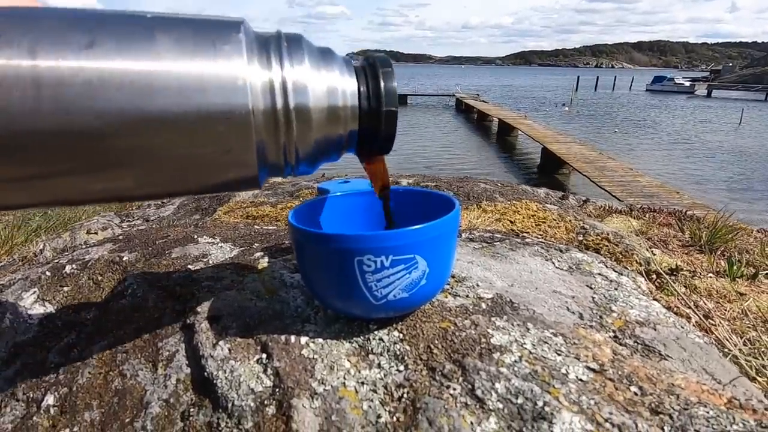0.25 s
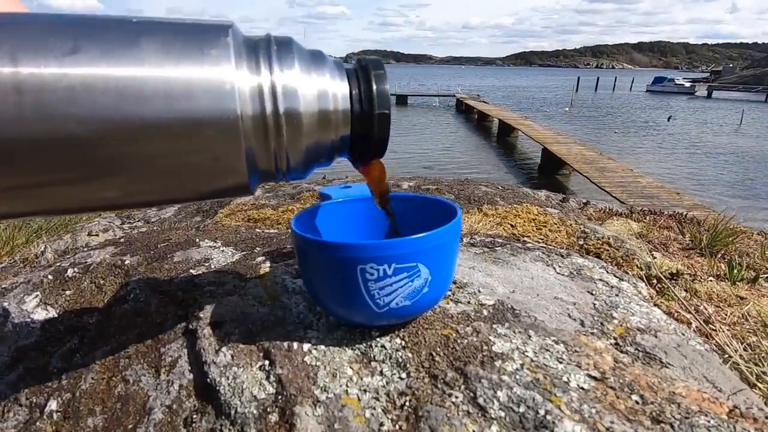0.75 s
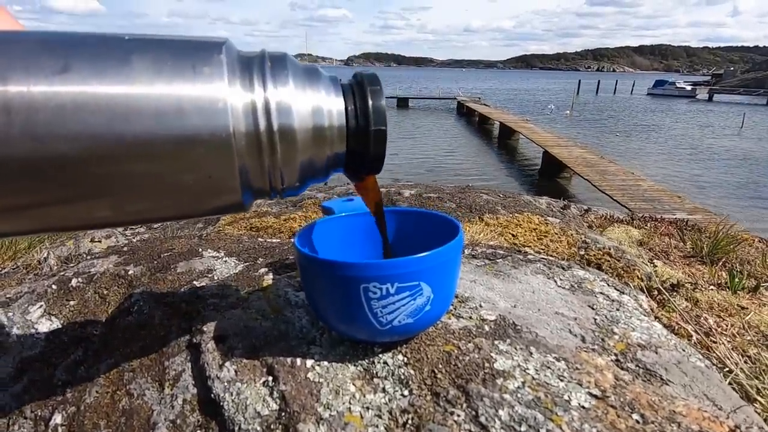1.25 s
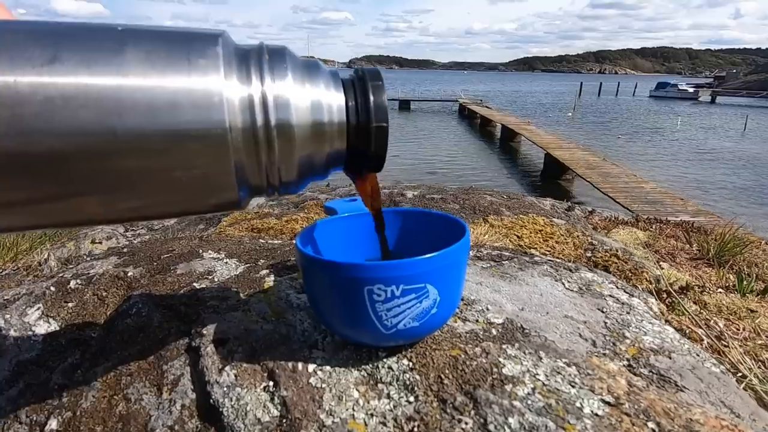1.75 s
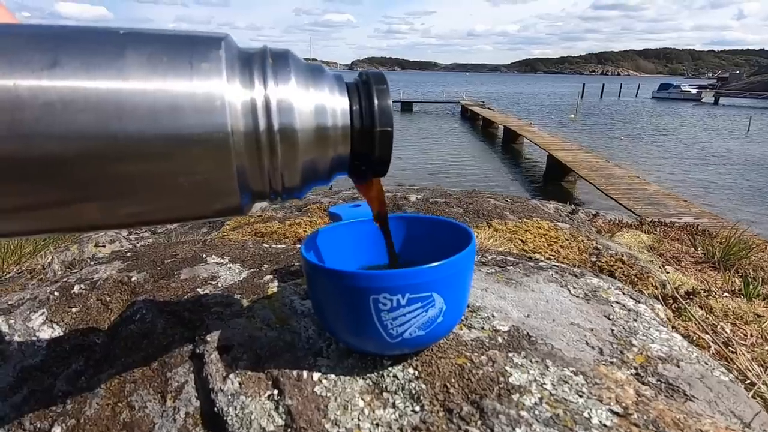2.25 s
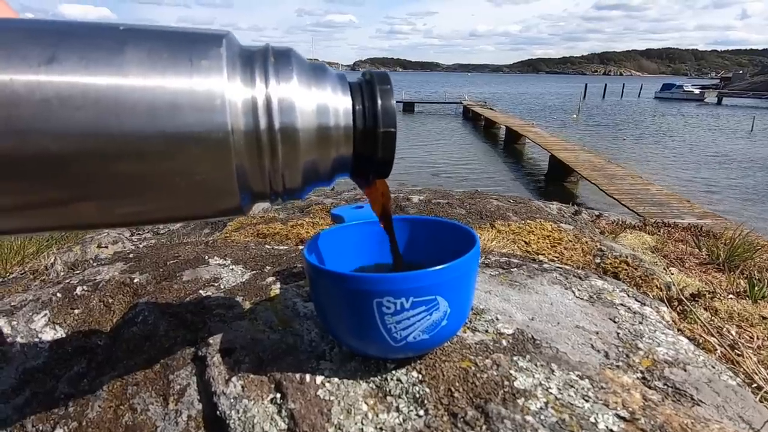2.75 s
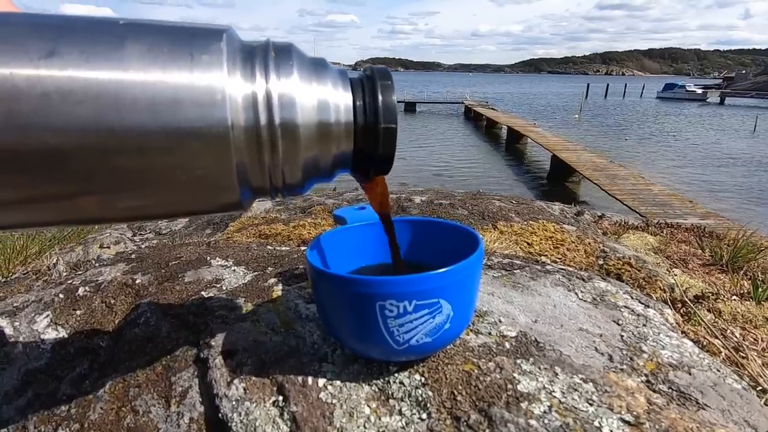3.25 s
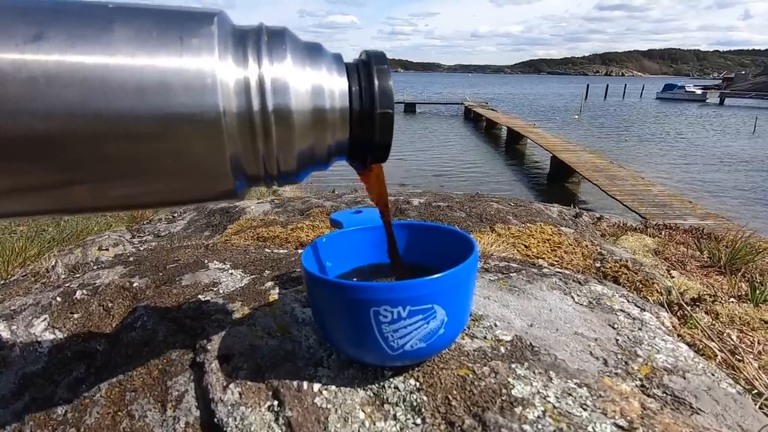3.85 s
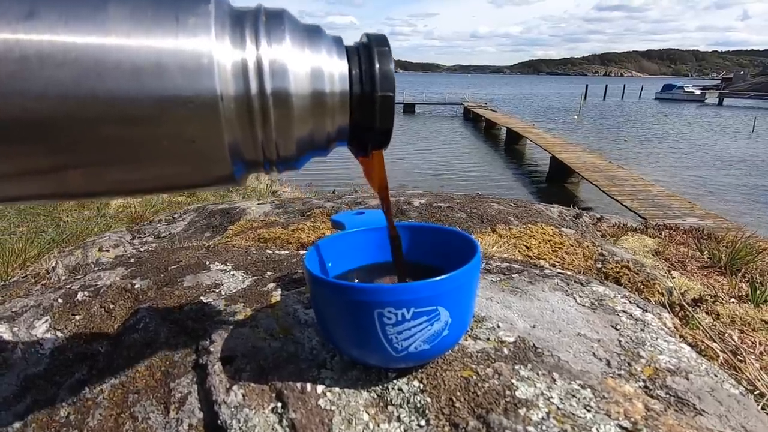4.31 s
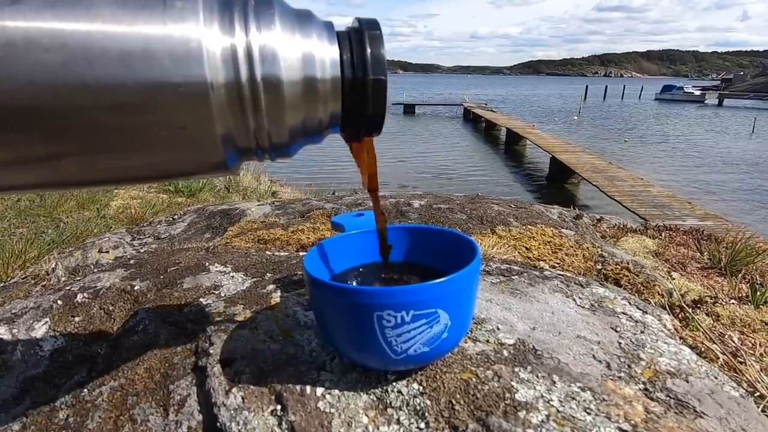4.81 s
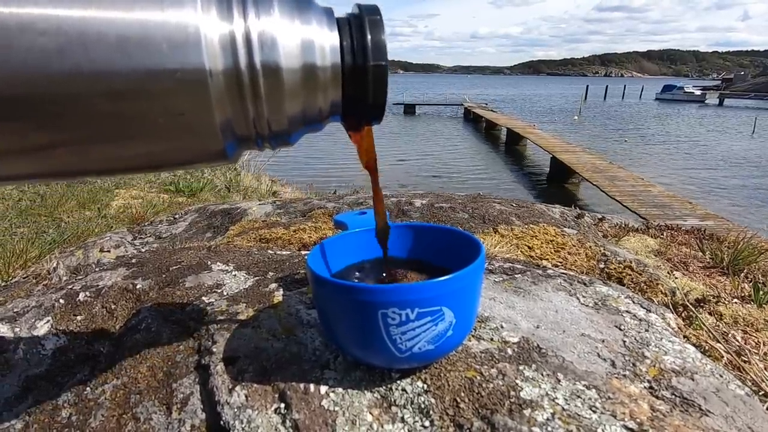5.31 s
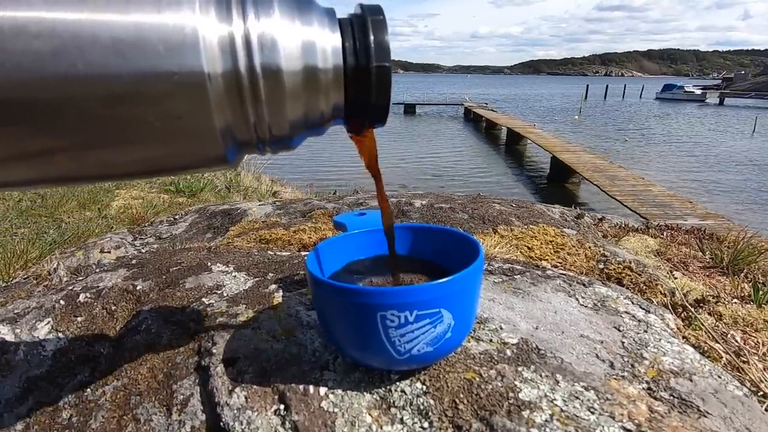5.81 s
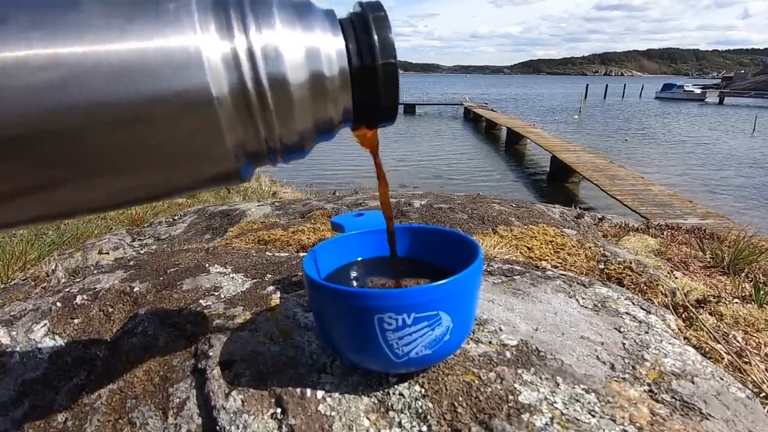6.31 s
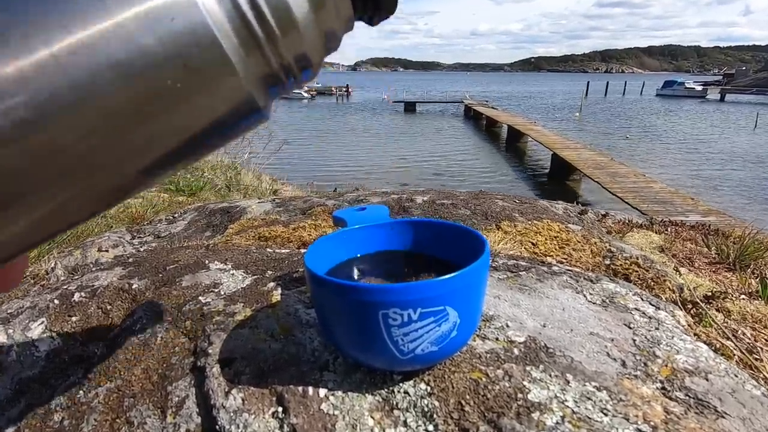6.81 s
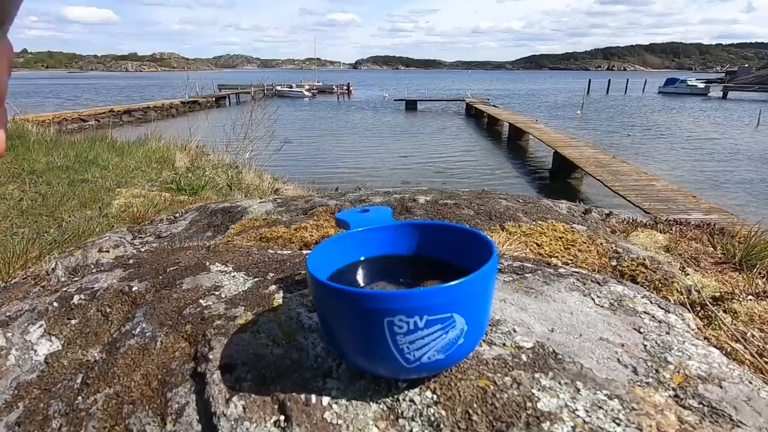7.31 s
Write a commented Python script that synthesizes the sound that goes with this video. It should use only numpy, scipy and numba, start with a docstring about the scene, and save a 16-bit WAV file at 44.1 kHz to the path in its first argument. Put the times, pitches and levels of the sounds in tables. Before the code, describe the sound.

A close pour from a steel flask into a plastic cup: bright spatter first, then dense watery bubbling with hollow, sinking cup resonance, ending in a few lower plops. Deep wind buffets hit the microphone irregularly throughout. Behind lie a faint shore wash, a far motor humming over the water and brief high chirps. After the pour, light knocks and a short ringing scrape of steel on stone.

```python
"""Wind rumbles and buffets the microphone, an engine drones far off over the water, a stopper knocks.
Then a drink is poured from a steel flask into a plastic cup on a rock by the sea.
Bubbles are decaying sines with a rising pitch; splashes, patter and wind are shaped noise.
Moving resonances ring the cup, whose walls sound deeper as it fills.
Last, noise bursts through the flask's modes set it down scraping on the rock."""
import sys
import numpy as np
from scipy import signal
from scipy.fft import rfft, irfft
from scipy.io import wavfile
from scipy.ndimage import uniform_filter1d
from numba import njit

SR = 44100
rng = np.random.default_rng(int(sys.argv[2]) if len(sys.argv) > 2 else 0)


def materialize(psi):
    """Save the field psi as 16-bit PCM at rate SR to the path in sys.argv[1].

    A 1-D psi becomes a single channel; in a 2-D psi each row is a channel.
    """
    bounded = np.clip(np.atleast_2d(psi).T, -1, 1)
    quanta = np.round(bounded * 32767).astype(np.int16)
    wavfile.write(sys.argv[1], SR, quanta)


N = 333545
TIME = np.arange(N) / SR


def undb(db):
    """Decibels to gain."""
    return 10 ** (np.asarray(db) / 20)


def unit(x):
    """Scale to rms 1."""
    return x / np.sqrt(np.mean(x ** 2) + 1e-20)


def curves(table):
    """The columns of a table, joined by straight lines in time."""
    s, *columns = np.transpose(table)
    return [np.interp(TIME, s, column) for column in columns]


def add(out, s, sound):
    """Mix a sound in at time s."""
    i = int(np.clip(s * SR, 0, N - 1))
    out[i:i + len(sound)] += sound[:N - i]


def butter(x, order, hz, kind="low"):
    """Causal low- or high-pass."""
    return signal.sosfilt(signal.butter(order, hz, kind, fs=SR, output="sos"), x)


def colour(x, points, size=1024):
    """Causal minimum-phase filter of unit energy through f/Hz, level/dB points."""
    hz, db = np.transpose(points)
    bins_hz = np.fft.rfftfreq(size, 1 / SR)
    bins_db = np.interp(np.log(bins_hz + 1), np.log(hz), db)
    # folding the cepstrum onto positive time gives the minimum phase
    cepstrum = irfft(np.log(undb(bins_db)))[:size // 2]
    cepstrum[1:] *= 2
    response = irfft(np.exp(rfft(cepstrum, size)))
    return signal.oaconvolve(x, response / np.linalg.norm(response))[:len(x)]


def noise(points):
    """Coloured noise of rms 1."""
    return unit(colour(rng.standard_normal(N), points, size=8192))


def ring(x, modes):
    """Sum of resonances, each f/Hz, width/Hz, level/dB."""
    out = 0
    for hz, width, db in modes:
        out = out + undb(db) * signal.lfilter(*signal.iirpeak(hz, hz / width, SR), x)
    return out


def walk(rate):
    """Smooth random drift of rms 1, with a new target this many times a second."""
    k = int(SR / rate)
    steps = np.repeat(rng.standard_normal(N // k + 1), k)
    return unit(uniform_filter1d(steps, k)[:N])


def steady(x, seconds):
    """Even out the slow swells of a noise."""
    return x / np.sqrt(uniform_filter1d(x ** 2, int(seconds * SR)) + 0.0081)


# Colour of the air and water along the shore: f/Hz, level/dB
SHORE_COLOUR = [(30, 6), (150, -4.5), (300, -9.5), (520, -12), (750, -7), (1000, -17.5), (2400, -21),
                (3200, -29), (5000, -32), (6000, -46), (7100, -36), (9000, -39.5), (13000, -57.5)]


def shore():
    """The wash of air and water along the shore: coloured noise with a slowly wandering level."""
    level_db = np.interp(TIME, [0, 3, 5.8, 7], [-61.5, -60.5, -60.5, -58])
    return noise(SHORE_COLOUR) * undb(level_db + 1.0 * walk(1.855))


# Course of the far engine: t/s, firing rate f/Hz, level/dB
ENGINE_COURSE = [(0, 132, -76.5), (2.6, 139.8, -68.5), (3.3, 138.4, -67), (4.2, 132.7, -67.5),
                 (5.85, 137.6, -69.5), (6.7, 142.9, -62), (7.56, 142.3, -60)]
# Engine harmonics: multiple of the firing rate, mean level/dB
ENGINE_HARMONICS = [(3, 1), (4, 1), (5, 4.5), (6, -7.5)]
ENGINE_WAVER = 0.0094  # rms share of the firing rate


def engine():
    """Harmonics of a firing rate, each wavering in pitch and level, make a drone."""
    hz, level_db = curves(ENGINE_COURSE)
    drone = 0
    for order, order_db in ENGINE_HARMONICS:
        harmonic_hz = order * hz * (1 + ENGINE_WAVER * walk(70))
        phase = 2 * np.pi * np.cumsum(harmonic_hz) / SR
        drone = drone + undb(order_db + 3 * walk(13)) * np.sin(phase)
    return unit(drone) * undb(level_db)


# Whistles: t/s, length/s, level/dB, starting f/Hz, closing f/Hz
WHISTLE_CALLS = [(2.517, 0.15, -67.5, 2940, 3350), (2.774, 0.086, -70.5, 3950, 3050),
                 (2.86, 0.055, -69, 3850, 4000), (2.98, 0.056, -66, 3400, 3470),
                 (3.097, 0.14, -59.5, 3030, 2930)]


def whistle(arch=0.088):
    """Thin arching whistles, like a far bird: sines bowed upward by a share of their pitch."""
    out = np.zeros(N)
    for start, length, db, start_hz, end_hz in WHISTLE_CALLS:
        bow = np.sin(np.linspace(0, np.pi, int(length * SR)))
        hz = np.linspace(start_hz, end_hz, len(bow)) * (1 + arch * bow)
        phase = 2 * np.pi * np.cumsum(hz) / SR
        add(out, start, undb(db) * np.sqrt(np.abs(bow)) * np.sin(phase))
    return out


# Wind strength, as its rumble on the microphone: t/s, level/dB
GUST_LEVEL = [(0, -46.5), (.3, -41), (.45, -34), (.75, -33), (1.9, -38.5), (2.42, -53.5), (2.72, -41.5),
              (2.95, -36), (3.12, -45), (3.5, -33), (3.85, -47.5), (4.08, -37), (4.35, -37), (4.72, -30),
              (5.4, -37), (5.72, -65.5), (5.92, -51.5), (6.2, -35.5), (6.36, -42), (6.55, -29.5),
              (6.92, -38.5), (7.33, -32), (7.56, -37)]
# Colour of the big eddies: f/Hz, level/dB
RUMBLE_COLOUR = [(12, -2), (25, 4.5), (55, 8), (95, -1), (130, -14), (220, -27.5), (1000, -100)]
# Colour of the small eddies: f/Hz, level/dB
FLUTTER_COLOUR = [(60, -12.5), (120, 0), (190, 1.5), (270, -12.5), (400, -17), (600, -29), (1000, -51.5),
                  (3000, -100)]
# flutter level (dB) at a reference rumble (dB), dB per dB of rumble, and rms unsteadiness (dB)
FLUTTER_DB, FLUTTER_AT_DB, FLUTTER_SLOPE, PUFFINESS_DB = -45.5, -36.5, 0.89, 5.5


def wind():
    """Big eddies rumble on the microphone; small ones flutter in quick puffs that grow with the gusts."""
    gust_db, = curves(GUST_LEVEL)
    puff_db = FLUTTER_DB + FLUTTER_SLOPE * (gust_db - FLUTTER_AT_DB) + PUFFINESS_DB * walk(22)
    rumble = steady(noise(RUMBLE_COLOUR), 0.31) * undb(gust_db)
    flutter = steady(noise(FLUTTER_COLOUR), 0.068) * undb(puff_db)
    return rumble + flutter


EDDY_MIDDLE_S = .35  # from the start of an eddy to its peak


def eddy(out_db, length, low_hz, top_hz, lumps_db, order=5):
    """Band-limited air noise that builds to a peak at its middle and trails away."""
    t = np.arange(-EDDY_MIDDLE_S, EDDY_MIDDLE_S, 1 / SR)
    swell = 1 / np.cosh(np.minimum(np.pi * np.abs(t) / length, 20))
    air = rng.standard_normal(len(t)) * undb(lumps_db * walk(130)[:len(t)]) * swell
    air = butter(butter(air, order, top_hz), 2, low_hz, "high")
    # a longer eddy carries more energy
    return undb(out_db) * unit(air) * np.sqrt(length / (1.37 * EDDY_MIDDLE_S))


# Round thumps of wind: middle t/s, length/s, level/dB, top f/Hz
WIND_THUMPS = [(0.4, 0.035, -33, 123), (0.611, 0.06, -35, 168), (0.732, 0.063, -28, 195),
               (0.771, 0.051, -26, 259), (0.895, 0.025, -31, 179), (0.96, 0.048, -34, 214),
               (1.139, 0.13, -35.5, 210), (1.248, 0.036, -30.5, 254), (1.614, 0.041, -31.5, 177),
               (1.734, 0.069, -35, 171), (1.913, 0.054, -31.5, 251), (2.184, 0.089, -38.5, 194),
               (2.312, 0.061, -36, 230), (2.501, 0.046, -36, 182), (2.737, 0.039, -37.5, 243),
               (2.911, 0.077, -32, 199), (3.469, 0.041, -37, 162), (3.605, 0.033, -33.5, 220),
               (4.524, 0.096, -34, 176), (4.678, 0.019, -26, 130), (4.707, 0.031, -22, 248),
               (4.846, 0.055, -28.5, 142), (5.212, 0.011, -17.5, 217), (5.248, 0.04, -21.5, 290),
               (5.356, 0.11, -32.5, 124.4), (6.23, 0.1, -39, 139), (6.554, 0.043, -30, 183),
               (6.698, 0.023, -29.5, 214), (6.815, 0.031, -30.5, 197), (6.999, 0.034, -35.5, 197),
               (7.164, 0.038, -34.5, 88), (7.328, 0.024, -27, 117), (7.447, 0.016, -30, 150)]
# Airflow tearing at the edge of the port: middle t/s, length/s, level/dB, top f/Hz
WIND_TEARS = [(0.777, 0.053, -39.5, 430), (0.944, 0.07, -55.5, 500), (1.253, 0.079, -45, 460),
              (1.381, .11, -48.5, 465), (1.92, 0.032, -53, 382), (4.698, 0.014, -34.5, 540),
              (5.209, 0.025, -35.5, 425), (5.253, 0.039, -30, 555)]
TEAR_LOW_HZ, TEAR_LUMPS_DB = 277, 7.5  # torn air holds little bass and comes in lumps


def buffets():
    """Fast eddies hit the port with round thumps; torn airflow adds a rougher, higher flutter."""
    out = np.zeros(N)
    for s, length, db, top_hz in WIND_THUMPS:
        add(out, s - EDDY_MIDDLE_S, eddy(db, length, 85, top_hz, lumps_db=0.5))
    for s, length, db, top_hz in WIND_TEARS:
        add(out, s - EDDY_MIDDLE_S, eddy(db, length, TEAR_LOW_HZ, top_hz, TEAR_LUMPS_DB, order=4))
    return out


# The flask touches the rock: t/s, relative level/dB, decay/s
ROCK_SCRAPES = [(7.181, -64.5, 0.014), (7.204, -57, 0.012), (7.235, -54.5, 0.011), (7.271, -61, 0.037),
                (7.293, -59, 0.016), (7.333, -68, 0.062), (7.483, -64.5, 0.028), (7.537, -67, .012)]
# Modes of the steel flask: f/Hz, width/Hz, relative level/dB
FLASK_MODES = [(958, 30, 8), (1440, 28, 0), (1960, 47, 8), (2486, 42, -0.5), (3330, 64, -7),
               (4240, 45, -1.5), (4660, 32, -8.5), (5150, 45, -10.5), (6800, 80, -11)]
# Light knocks of the stopper: t/s, relative level/dB, f/Hz
STOPPER_KNOCKS = [(0.069, -42, 3250), (0.14, -44.5, 2290), (.51, -46, 4770), (7.048, -42, 2580),
                  (7.072, -44, 2200), (7.485, -34.5, 2780)]
KNOCK_WIDTH_HZ, KNOCK_DECAY_S = 200, 0.0051


def flask(contact_db=3):
    """Steel grates over rock, each contact favouring other modes; the stopper gives dull, rattling knocks."""
    grit, steel, knocks = np.zeros(N), np.zeros(N), np.zeros(N)
    t = np.arange(SR // 2) / SR
    for s, db, length in ROCK_SCRAPES:
        grains = unit(rng.standard_normal(len(t)) * undb(4 * walk(900)[:len(t)]))
        push = undb(db) * np.exp(-t / length) * grains
        modes = [(hz, width, mode_db + contact_db * rng.uniform(-1.1, 1))
                 for hz, width, mode_db in FLASK_MODES]
        add(grit, s, push)
        add(steel, s, ring(push, modes))
    for s, db, hz in STOPPER_KNOCKS:
        tap = undb(db) * rng.standard_normal(len(t)) * np.exp(-t / KNOCK_DECAY_S)
        add(knocks, s, ring(tap, [(hz, KNOCK_WIDTH_HZ, 3), (hz * 1.45, KNOCK_WIDTH_HZ, -6)]))
        add(grit, s, undb(-21) * tap)
    body = butter(undb(21) * steel + knocks, 2, 7500)
    return body + colour(grit, SPLASH_COLOUR)  # grit shares the colour of the splashes


@njit
def resonator(x, hz, width):
    """State-variable band-pass with a moving centre."""
    y, band, low = np.empty(len(x)), 0., 0.
    for i in range(len(x)):
        g, k = np.tan(np.pi * hz[i] / SR), width / hz[i]
        v = (band + g * (x[i] - low)) / (1 + g * (g + k))
        band, low, y[i] = 2 * v - band, low + 2 * g * v, k * v
    return y


# Two low wall modes, mostly sinking as liquid loads the wall: t/s, first f/Hz, second f/Hz
WALL_MODES = [(0, 1490, 2730), (1.8, 1390, 2490), (2.6, 1360, 2070), (3.6, 1040, 1730), (4.8, 873, 1460),
              (5.9, 980, 1340), (6.6, 950, 1590)]
# Fixed resonances of the cup: f/Hz, width/Hz, level/dB
CUP_MODES = [(3120, 220, -2), (4600, 250, -12), (7250, 350, -5)]
WALL_WIDTH_HZ = 115.


def cup(x, first_db, second_db):
    """A sound in the liquid, with fixed and moving resonances of the cup around it."""
    first_hz, second_hz = curves(WALL_MODES)
    depth = np.interp(TIME, [1, 5], [.15, 1])  # more liquid couples more strongly to the wall
    first = undb(first_db) * resonator(x, first_hz, WALL_WIDTH_HZ)
    second = undb(second_db) * depth * resonator(x, second_hz, WALL_WIDTH_HZ)
    return x + ring(x, CUP_MODES) + first + second


def bubble(hz, t60, rise, pinch_cycles=1.0):
    """A trapped bubble swells as it pinches off, rings and dies, its pitch rising as it nears the surface."""
    t = np.arange(int(t60 * SR)) / SR
    tone = np.sin(2 * np.pi * hz * t * (1 + rise * t / t60 / 2))
    swell = 1 - np.exp(-(t * hz / pinch_cycles) ** 2)
    return tone * undb(-60 * t / t60) * swell


def swarm(count, low_hz, high_hz, spread_db):
    """Short-lived bubbles of random time, pitch and strength, together at rms 1."""
    out = np.zeros(N)
    for when, pitch, size, cycles, glide in rng.random((count, 5)):
        hz = low_hz * (high_hz / low_hz) ** pitch
        gain = undb(spread_db * min(-np.log(1 - size), 3.0))
        t60 = (5 + 30 * cycles ** 2) / hz
        add(out, when * N / SR, gain * bubble(hz, t60, rise=0.15 * glide, pinch_cycles=0.43))
    return unit(out)


def spurts(count):
    """Noise in small equal bursts that start at once and die quickly, together at rms 1."""
    kicks = np.zeros(N)
    for when in rng.random(count):
        kicks[int(when * N)] += 1
    envelope = signal.lfilter([1], [1, -np.exp(-1 / (.0022 * SR))], kicks)  # 2.2 ms decay
    return unit(rng.standard_normal(N) * envelope)


# How hard the stream churns the drink; also guides gurgle and lesser bubbles: t/s, relative level/dB
STREAM_LEVEL = [(0, -81), (.74, -76.5), (.85, -66.5), (1.35, -58), (1.78, -51.5), (2.22, -65),
                (2.75, -65.5), (2.92, -55.5), (3.45, -63), (3.72, -56), (4.0, -58.5), (5.0, -51),
                (5.7, -59), (6.15, -57), (6.4, -61), (6.64, -62)]
# Colour of the patter: f/Hz, level/dB
PATTER_COLOUR = [(450, -5), (900, -33.5), (1600, -3.5), (2600, -1), (3150, 4.5), (4400, -6), (5700, -18.5),
                 (7300, -23.5), (8800, -34), (11000, -41.5), (14000, -46.5)]
POUR_START_S, POUR_END_S, CUT_OFF_S = 0.63, 6.69, .05
# spatter on the bare bottom: its gain at first, and how soon the rising drink damps it
SPRAY_GAIN, SPRAY_FADE_S = 49, .6


def patter():
    """Under the stream many small bubbles burst and the liquid churns in quick spurts."""
    level_db, = curves(STREAM_LEVEL)
    bursts = swarm(count=4500, low_hz=773, high_hz=8710, spread_db=2.5)
    grains = bursts + undb(4) * spurts(count=800)
    grains = colour(grains * undb(5.1 * walk(70)), PATTER_COLOUR)
    # on the nearly bare bottom the stream spatters more brightly; deep liquid dulls it
    spray = signal.sosfiltfilt(signal.butter(2, 4200, "high", fs=SR, output="sos"), grains)
    bright = SPRAY_GAIN * np.exp(-np.maximum(TIME - POUR_START_S, 0) / SPRAY_FADE_S)
    sound = steady(unit(cup(grains, first_db=7.5, second_db=6.5) + bright * spray), 0.21)
    flowing = np.clip((POUR_END_S - TIME) / CUT_OFF_S, 0, 1)
    return sound * undb(level_db - 3.0) * flowing


def gurgle():
    """Larger pockets of air dragged under the surface give the pour its low, overlapping body."""
    level_db, = curves(STREAM_LEVEL)
    fade = np.interp(TIME, [1.4, 1.8, POUR_END_S - CUT_OFF_S, POUR_END_S], [0, 1, 1, 0])
    pockets = swarm(count=520, low_hz=800, high_hz=2500, spread_db=1.2)
    return pockets * fade * undb(level_db - 9)


BRIGHT_HZ = 5000  # a splash's treble lies above this


def splash(bright_db, count=9, size=1800):
    """The surface snaps shut, throws tiny droplets of their own pitch and leaves a wet wash; unit energy."""
    t = np.arange(size) / SR
    snap = 0.79 * rng.standard_normal(size) * np.exp(-t / 0.0024) * (1 - np.exp(-t / 0.00031))
    wash = undb(-16) * np.exp(-t / 0.015) * rng.standard_normal(size)
    out = snap + wash
    for pitch, lag, strength in rng.random((count, 3)):
        hz = 1500 * 5.5 ** pitch
        age = np.maximum(t - .008 * lag ** 2, 0)
        droplet = np.sin(2 * np.pi * hz * age) * np.exp(-age * hz / 1.4)
        out += 2.1 * strength * (1 - 0.8 * lag) * droplet
    lowpass = signal.butter(3, BRIGHT_HZ, fs=SR, output="sos")
    body = signal.sosfiltfilt(lowpass, out, padtype=None)
    out = body + undb(bright_db + 16.5) * (out - body)
    return out / np.linalg.norm(out)


# lesser bubbles: level over the stream (dB), scatter either way (dB), splash against the bubble (dB)
LESSER_DB, LESSER_SPREAD_DB, LESSER_SPLASH_DB = 14.5, 3.5, 4.5
# their final lowest and highest pitch, largest pitch rise (share), and cycles to die by 60 dB
LESSER_LOW_HZ, LESSER_HIGH_HZ, LESSER_RISE, LESSER_CYCLES = 1600, 5090, 0.1, 18
# a shallow drink holds only small bubbles: how much higher the lowest pitch starts, how soon it sinks
SHALLOW_HZ, SHALLOW_S = 1990, 0.89


def lesser_bubbles(count):
    """The stream traps air unevenly, louder the harder it churns: rows of t/s, level/dB, f/Hz, rise."""
    when, size, pitch, glide = rng.random((count, 4)).T
    pour_s = POUR_END_S - CUT_OFF_S - POUR_START_S
    s = POUR_START_S + pour_s * (np.arange(count) + 3 * when) / (count + 2)
    stream_db = np.interp(s, *np.transpose(STREAM_LEVEL))
    db = stream_db + LESSER_DB + LESSER_SPREAD_DB * (2 * size - 1)
    low_hz = LESSER_LOW_HZ + SHALLOW_HZ * np.exp(-(s - POUR_START_S) / SHALLOW_S)
    return zip(s, db, low_hz * (LESSER_HIGH_HZ / low_hz) ** pitch, LESSER_RISE * glide)


# Loudest bubbles: t/s, relative level/dB, f/Hz, relative splash level/dB, relative splash treble/dB
LOUD_BUBBLES = [(0.852, -36, 3450, -23.5, 13), (0.8952, -41.5, 1970, -38, -14.5),
                (0.9866, -41.5, 4250, -25, 26), (1.0788, -44, 3120, -20.5, 27), (1.118, -39, 3020, -36, 2),
                (1.3, -35, 3010.0, -47, 1), (1.322, -40.0, 2950, -35, 3), (1.4116, -40.5, 2520, -35, 5),
                (1.4546, -36, 2870, -20, 5), (1.642, -27.5, 3420, -14, 15), (1.672, -35.5, 2810, -39, -7.0),
                (1.7355, -30.5, 1340, -26, -1), (1.757, -42, 1440, -30, -6), (1.7701, -33, 3040, -33, 5),
                (1.7855, -37, 3400.0, -32, 3), (1.8026, -29, 3320, -25, 7), (1.816, -34, 3140, -29, -11),
                (1.8768, -25, 2980, -31.5, -23), (1.8968, -33, 3440, -42, -17),
                (1.983, -42.5, 1340, -38.5, -17), (2.0204, -32.5, 4200, -28, 4),
                (2.0638, -37, 3040, -41, -17), (2.0847, -33, 3180, -33, -8), (2.0998, -41, 1335, -41, -14),
                (2.171, -32, 2800, -28, -36), (2.3007, -41, 3000, -25.5, 1),
                (2.363, -31.5, 4100, -27.5, -8), (2.3728, -29.5, 3060, -35, -15),
                (2.4413, -42, 1290, -30, -12), (2.467, -34, 3100, -23.5, -1),
                (2.4953, -30, 3840, -29.5, -4), (2.5454, -53, 2380, -31.5, -22),
                (2.6128, -39, 1160, -22.5, -1), (2.626, -29.5, 3040, -19, 0),
                (2.7418, -36.5, 3670, -38, -5), (2.7717, -37.5, 3300, -42, -18),
                (2.858, -46, 2860.0, -30.5, -21), (2.9228, -35, 4430, -32, -9),
                (2.9746, -35, 2680, -24, -4), (2.994, -32, 3020, -39, -14), (3.0291, -38, 3230, -44, -15),
                (3.0487, -30, 4300, -31, -27), (3.135, -39, 3000, -49, -19), (3.191, -42, 3270, -36.5, -18),
                (3.257, -35.5, 3100, -33.5, -8), (3.295, -34, 3660, -18.5, 4),
                (3.364, -32.5, 3370, -23, -0.5), (3.535, -38, 2630, -24.5, -18.5),
                (3.7101, -34, 3170, -24, -14), (3.745, -39.0, 3330, -19.5, -2.5),
                (3.784, -41, 2840, -24, -3), (3.811, -41, 3340, -19, 3.5), (3.9417, -43, 2240, -29, -8),
                (4.0072, -34, 3524, -24, -12), (4.0427, -41, 3120, -31, -15),
                (4.0802, -32.5, 3820, -44, -12.0), (4.176, -29, 3180, -24.5, -10.5),
                (4.2449, -34.5, 1800, -36.5, -27), (4.3022, -38, 3120, -23.5, -5),
                (4.332, -35, 2230, -18, -1), (4.3578, -40, 2110, -23, 12), (4.4196, -37, 3030, -29, -9),
                (4.518, -35, 1780, -27.5, -27), (4.661, -41, 3300, -31, -16),
                (4.746, -29.5, 2090, -41, -18), (4.771, -35, 3240.0, -27, -16), (4.796, -34, 1610, -42, -8),
                (4.8337, -25.5, 1660, -18.5, -12.5), (4.8545, -37, 2000, -24, -14),
                (4.8782, -19.5, 3120, -18, -11.5), (4.9432, -45, 3290.0, -31, -11),
                (4.9636, -35, 3380.0, -37, -14), (4.9853, -34, 4500.0, -40, -8),
                (5.021, -30.0, 3380, -34, -23), (5.0776, -33, 3150, -24.5, -9),
                (5.123, -36, 2290, -29, -21), (5.156, -36, 4500, -35, -7), (5.2078, -42, 2950.0, -24, -11),
                (5.23, -25, 3550, -31, -29), (5.258, -36, 3250, -24.5, -18),
                (5.3165, -31.5, 3220, -23.5, -15), (5.364, -32, 3000, -31, 2),
                (5.3879, -30, 2950, -23, -17), (5.4063, -27, 3520, -26, -8), (5.4255, -29.5, 3500, -17, 1),
                (5.454, -35, 2170, -27, -5), (5.4967, -31, 2920, -22, -2), (5.545, -36, 1490, -33.5, -14),
                (5.5581, -35.5, 1580, -20.5, -5), (5.6385, -27, 3090, -20, 6), (5.684, -38, 1940, -40, -19),
                (5.704, -30, 1370, -25.5, -26), (5.8382, -29.5, 1400, -36, -9), (5.849, -40, 4730, -31, -1),
                (5.8936, -31, 1470, -28.5, -9), (5.92, -40, 1860, -26.5, -2),
                (6.003, -48, 2800, -30, -12.5), (6.1134, -34.5, 2090, -53, -20),
                (6.319, -29, 1390, -35.5, -29), (6.357, -36.5, 1420, -34, -16),
                (6.4242, -38, 2020.0, -29, 8), (6.442, -41.5, 1420, -27, -9),
                (6.4767, -39, 2620, -29.5, -17), (6.4936, -25.5, 1360, -29, -21),
                (6.5222, -42, 2750, -30.0, -27), (6.5405, -34, 1440, -15, -6), (6.577, -37, 1290, -27, -10),
                (6.6146, -26.5, 1380, -18.5, -6), (6.665, -49, 3500, -30, -2)]
# Colour of a splash: f/Hz, level/dB
SPLASH_COLOUR = [(450, -4.5), (850, -11.5), (1600, -3.5), (2500, 6.5), (3200, 3), (4600, -8), (5700, -14.5),
                 (7400, -16), (8800, -27.5), (12000, -32.5), (15000, -36)]
# cycles to die by 60 dB, so big bubbles ring longer, up to a limit; loud ones then scatter around it
RING_CYCLES, LONGEST_RING_S = 51, .026
GLIDE_PER_KHZ = .07  # small bubbles reach the surface sooner, so their pitch can rise more
# a bubble sheds a smaller one just after it forms: level against it, longest delay
DAUGHTER_DB, DAUGHTER_LAG_S = -14.5, 0.025


def plinks():
    """Loud bubbles splash and shed smaller ones amid a run of lesser bubbles; all ring the cup."""
    bubbles, splashes = np.zeros(N), np.zeros(N)
    chances = rng.random((len(LOUD_BUBBLES), 4))
    for (s, db, hz, splash_db, bright_db), (glide, life, lag, split) in zip(LOUD_BUBBLES, chances):
        t60 = min(RING_CYCLES / hz, LONGEST_RING_S) * 2 ** (life - .5)
        rise = GLIDE_PER_KHZ * hz / 1000 * glide
        add(bubbles, s, undb(db) * bubble(hz, t60, rise))
        daughter_hz = hz * (LESSER_HIGH_HZ / hz) ** split
        daughter = bubble(daughter_hz, RING_CYCLES / daughter_hz, LESSER_RISE)
        add(bubbles, s + DAUGHTER_LAG_S * lag, undb(db + DAUGHTER_DB) * daughter)
        add(splashes, s, undb(splash_db) * splash(bright_db))
    for s, db, hz, rise in lesser_bubbles(count=130):
        add(bubbles, s, undb(db) * bubble(hz, LESSER_CYCLES / hz, rise))
        add(splashes, s, undb(db + LESSER_SPLASH_DB) * splash(bright_db=2.0))
    struck = colour(splashes, SPLASH_COLOUR) + 0.092 * bubbles
    return 0.6 * bubbles + cup(struck, first_db=16.5, second_db=1.0)


def scene():
    """Everything in the open air, at one microphone."""
    background = shore() + engine() + whistle() + wind() + buffets()
    pour = patter() + gurgle() + plinks()
    return (background + flask() + pour)[None]


TOP_HZ = 14100


def record(dry):
    """The recorder cuts the top with a steep elliptic low-pass."""
    return signal.sosfilt(signal.ellip(8, .2, 70, TOP_HZ, fs=SR, output="sos"), dry)


dry = scene()
out = record(dry)
materialize(out)
```